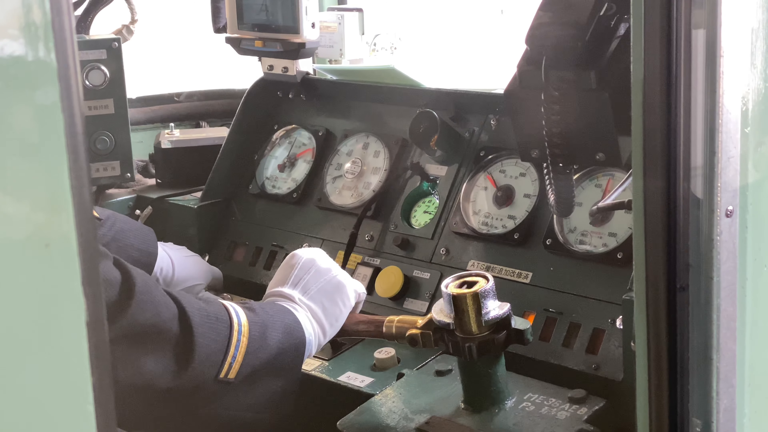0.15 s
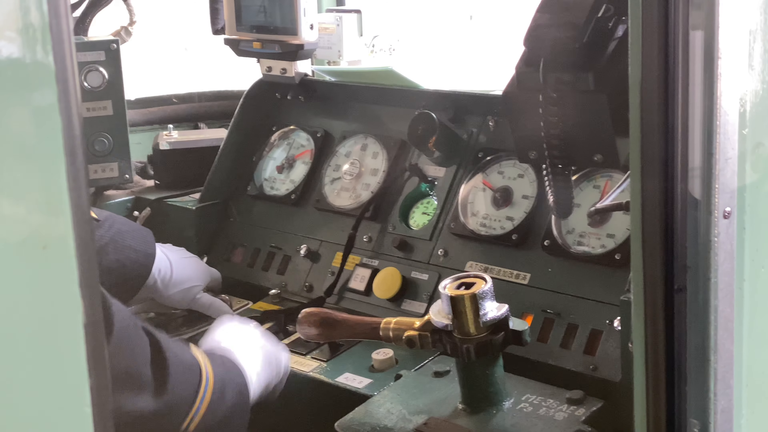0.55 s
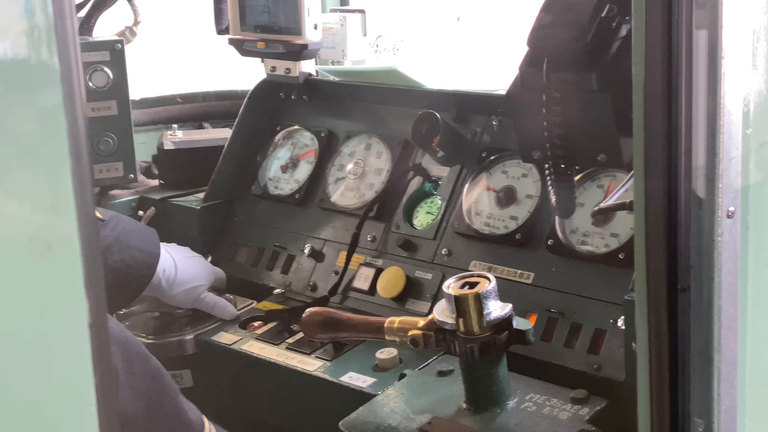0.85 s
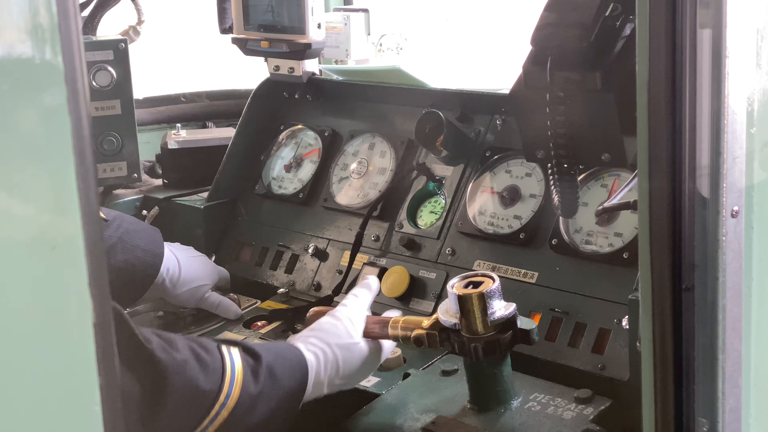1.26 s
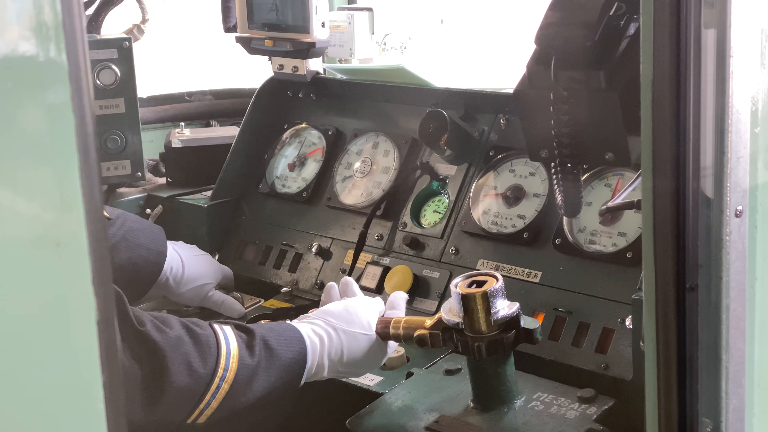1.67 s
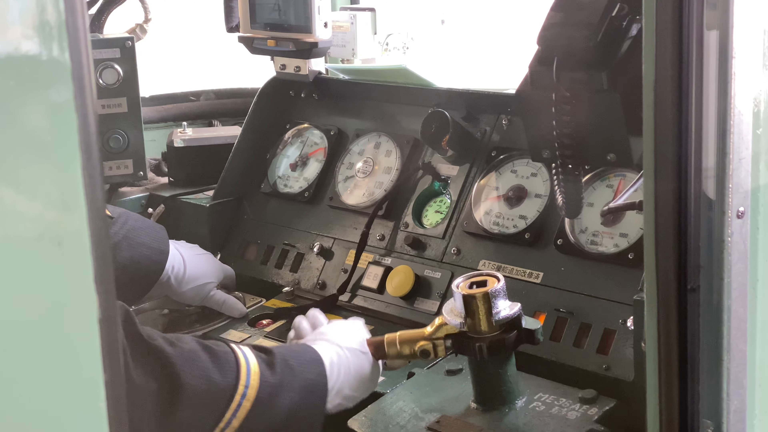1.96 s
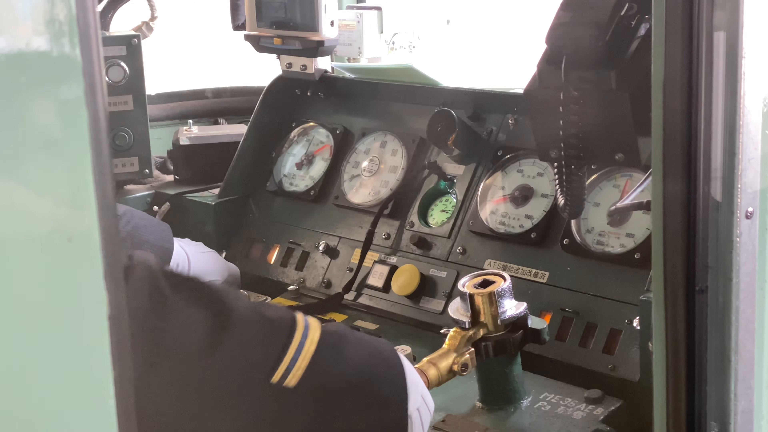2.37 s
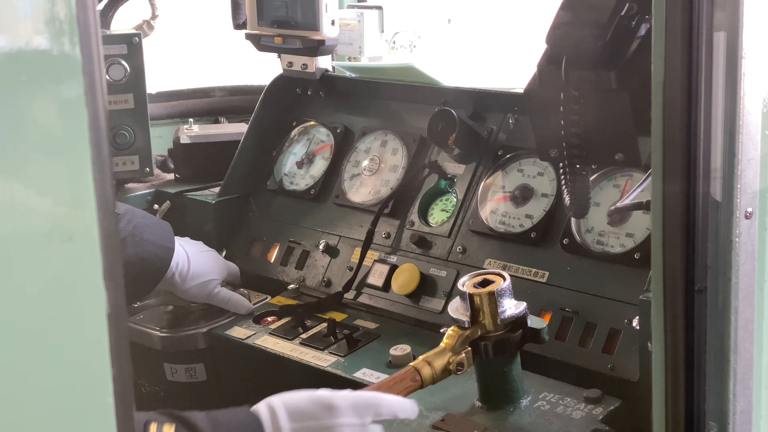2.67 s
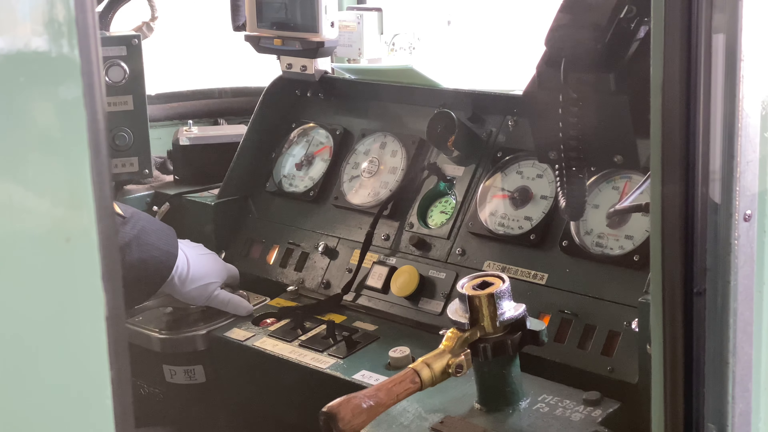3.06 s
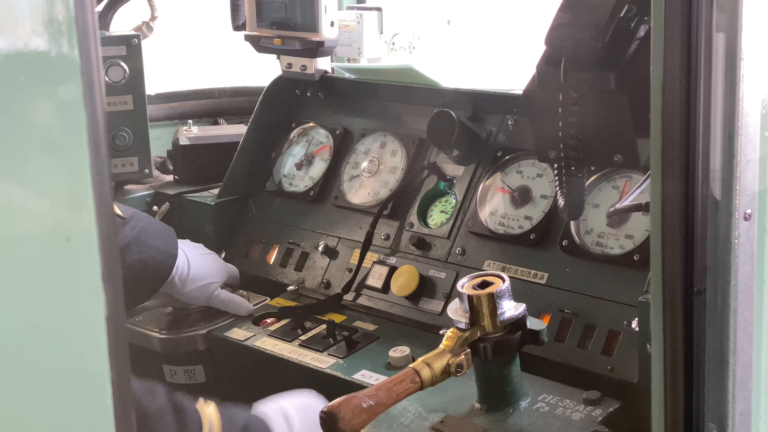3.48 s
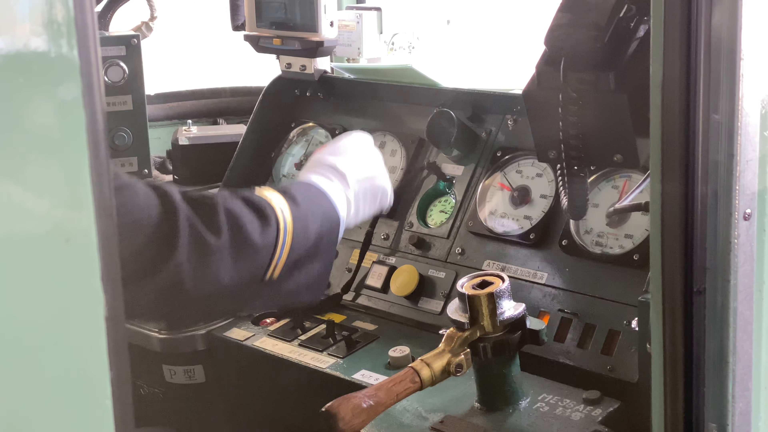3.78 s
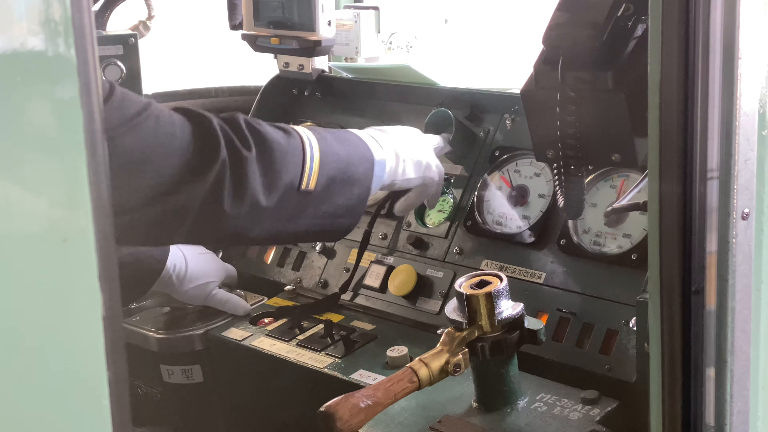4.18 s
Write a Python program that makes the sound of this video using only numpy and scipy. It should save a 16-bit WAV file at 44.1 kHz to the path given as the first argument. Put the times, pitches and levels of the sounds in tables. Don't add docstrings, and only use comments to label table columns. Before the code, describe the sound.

A brake handle ticks and knocks over a deep floor drone until it lands and pressurized air jets out, whistling and shaking loose fittings.

```python
import sys
import numpy as np
from scipy import signal
from scipy.fft import rfft, irfft, next_fast_len
from scipy.io import wavfile
from scipy.ndimage import uniform_filter1d, map_coordinates

SR = 44100
rng = np.random.default_rng(int(sys.argv[2]) if len(sys.argv) > 2 else 0)


def bounce(signal):
    frames = np.transpose(np.atleast_2d(signal))
    limited = np.clip(frames, -1, 1)
    pcm = np.round(limited * 32767).astype(np.int16)
    wavfile.write(sys.argv[1], SR, pcm)


def boost_factor(decibels):
    exponent = np.asarray(decibels, float) / 20
    return 10 ** exponent


N = 195495
T = np.arange(N) / SR
HIT_T = np.arange(SR // 3) / SR

# time [s], level [dB].
TREMBLE = [(0, -31), (.45, -35), (.9, -31.5), (1.2, -42), (1.7, -41.5), (2.0, -42.5), (2.3, -40),
           (2.55, -35), (2.7, -47), (2.97, -41.5), (3.05, -55), (3.2, -42.5), (3.3, -50), (3.5, -42.5),
           (3.7, -37.5), (3.8, -29), (4.3, -30.5), (4.43, -28)]
# peak time [s], peak level [dB], half length [s].
HEAVES = [(.07, -30.5, 0.019), (.26, -29.5, 0.023), (.35, -27.5, 0.02), (.44, -28.5, 0.03),
          (.64, -24.5, 0.037), (.7, -23.5, 0.01), (.82, -24.5, 0.03), (.92, -41, 0.045),
          (1.12, -31.5, 0.024), (1.33, -33, 0.059), (1.58, -37.5, .05), (2.23, -34.5, 0.027),
          (2.36, -26, 0.011), (2.54, -32, 0.056), (2.8, -38, 0.088), (3.0, -37, 0.011),
          (3.31, -30.5, 0.022), (3.37, -25.5, 0.017), (3.76, -31, 0.03), (3.96, -26, 0.054),
          (4.06, -32, 0.029)]
JOLTS = [(.0, -35.5, 0.036, -5.5), (.08, -38.5, 0.024, -6), (.16, -41, 0.049, -4.5),
         (.335, -38.5, 0.057, -20), (.48, -44.5, 0.058, -10), (.6, -46, .02, -17),
         (.71, -38.5, 0.051, -11.5), (.86, -44, 0.021, -6), (1.01, -50, 0.064, -19),
         (1.23, -46.5, 0.02, -7.5), (1.39, -40.5, 0.074, -10), (2.05, -42, 0.038, -4.5),
         (2.15, -43.5, 0.053, -6.5), (2.23, -40, 0.036, -7.5), (2.31, -38, 0.038, -12),
         (2.39, -39.5, 0.033, -8.5), (2.69, -50.5, 0.13, -6.5), (3.015, -44, 0.018, -0.5),
         (3.042, -47.5, 0.0093, 3.5), (3.17, -36, 0.12, -8), (3.26, -42.5, 0.014, 0),
         (3.3, -28.5, 0.013, -12.5), (3.345, -38, 0.03, 1), (3.39, -35, 0.025, -2),
         (3.42, -30.5, 0.028, -7.5), (3.64, -41.5, 0.12, -5), (3.77, -33.5, 0.015, -6),
         (3.9, -29.5, 0.088, -11.5), (4.015, -38, 0.035, -0.5), (4.07, -33, 0.042, -4),
         (4.16, -27.5, 0.057, -6.5), (4.235, -31.5, 0.016, -0.2), (4.29, -31.5, 0.057, -1.5),
         (4.35, -29, 0.023, -4.5), (4.4, -30.5, 0.03, -8.5)]
# frequency [Hz], level [dB].
FLOOR_COLOUR = [(18, -120), (26, -14), (33, -14.5), (42, -7), (56, 2), (68, -4.5), (85, -10), (110, -13),
                (150, -64), (250, -120)]
# frequency [Hz], level [dB].
BODY_COLOUR = [(40, -120), (70, 2), (100, -1.5), (130, 4.5), (200, -2), (240, -14.5), (300, -51),
               (500, -120)]
# frequency [Hz], level [dB].
PANEL_COLOUR = [(120, -120), (200, -3.5), (245, 1), (320, -2.5), (420, -8.5), (490, -16), (600, -24),
                (1000, -120)]
# frequency [Hz], level [dB].
RATTLE_COLOUR = [(250, -120), (450, -4), (535, 2), (650, -0.5), (870, -4), (1180, -10), (1440, -12.5),
                 (1800, -16.5), (2400, -14.5), (4000, -120)]
REST_DB = (-51, -53, -61)
FOLLOW = (0.74, 0.49, 0.15)
# what the jet shakes into each, relative to its own level [dB].
BLOWN_DB = (-14.5, -26.5, -23)

# time [s], flow [dB].
FLOW = [
    (3.06, -62),
    (3.078, -62),
    (3.085, -45),
    (3.1, -36),
    (3.116, -24),
    (3.16, -23),
    (3.6, -27),
    (4.1, -27),
    (4.43, -28.5),
]
# frequency [Hz], level [dB].
JET_COLOUR = [(700, -53), (1000, -19), (1620, -17), (1900, -6), (2390, -6), (3010, -12), (4200, -8.5),
              (5000, -9), (5700, -2.5), (7100, -7.5), (8100, -12.5), (11400, -17.5), (13300, -21.5),
              (14600, -17)]
# frequency [Hz], width [Hz], gain over the first rush [dB],
# gain over the settled jet [dB].
PIPES = [(2123, 14, 9, 9), (2151, 10, 5, 8), (2320, 13, 11, 12), (2405, 40, 2, 6), (2454, 18, 7, 8),
         (2510, 90, 0, 4), (2590, 25, 7, 2), (2653, 16, 7, 6), (2772, 20, -6, 7), (2857, 11, 21, 6),
         (3000, 800, 2, -12), (3140, 20, 11, 3), (3190, 20, 0, 6), (3495, 20, 9, 8), (4063, 28, 7, 6),
         (4256, 22, 6, 5), (5362, 12, 7, 7), (5600, 40, 5, 4), (6868, 18, 6, 6), (7039, 11, 10, 9),
         (7220, 14, 9, 8)]
# frequency [Hz], width [Hz], gain [dB].
HOLLOWS = [(1710, 98, -7.5), (1960, 61, -7), (2175, 60, -2), (2400, 150, 0), (2070, 43, 1)]
# frequency [Hz], level under the flow [dB], width [Hz].
WHISTLES = [(2123, -19, 8), (2151, -19, 8), (2300, -22, 8), (2320, -14, 7), (2412, -22, 12), (2453, -22, 9),
            (2492, -24, 9), (2653, -23, 10)]

# start [s], peak level [dB], ring [Hz], second, weaker ring [Hz], 60 dB decay [s].
TICKS = [(0.128, -43.5, 1470, 2780, 0.13), (1.3437, -47.5, 4480, 2980, 0.16), (1.344, -42, 3180, 5540, .03),
         (1.979, -52, 5600, 7660, 0.022), (2.033, -44, 2130, 2920, 0.025), (2.035, -54, 4140, 1300, 0.04),
         (2.227, -50, 5600, 1130, .03), (2.232, -47, 3700, 2400, .07), (2.9834, -50, 2060, 3670, 0.051),
         (3.0055, -44, 2070, 3540, 0.037), (3.033, -41.5, 3920, 3240, 0.11), (3.04, -41, 1970, 4400, 0.065),
         (3.06, -45, 3900, 3430, 0.063), (3.083, -31.5, 2160, 2440, 0.055)]
# start [s], peak level [dB], frequency [Hz], 60 dB decay [s].
KNOCKS = [(2.042, -26, 163, 0.077), (2.031, -24, 241, 0.049), (2.059, -34, 304, 0.21),
          (2.088, -18, 227, 0.042), (2.221, -29, 208, 0.11), (2.349, -28, 132, 0.076),
          (3.004, -25, 640, 0.044), (3.0322, -22, 322, 0.1), (3.065, -22, 318, 0.13),
          (3.005, -34, 294, 0.073), (3.328, -19, 150, 0.074)]
# start [s], peak level [dB], frequency [Hz], 60 dB decay [s].
LANDING = [
    (3.0843, -16, 143, .06),
    (3.0913, -10.5, 143, .06),
]
# start [s], peak level [dB], frequency [Hz], 60 dB decay [s], snap [dB].
REBOUND = [
    (3.1097, -14.5, 165, .065, -30),
]
# start [s], peak level [dB], frequency [Hz], 60 dB decay [s].
SHUDDERS = [(0.128, -51, 1395, .15), (3.05, -35, 105, 0.22), (3.405, -24, 150.4, .2),
            (3.92, -34, 335, 0.093), (1.235, -38, 250, 0.13), (1.42, -35.5, 180, 0.31),
            (3.15, -26.5, 140, 0.25), (2.13, -38, 231, 0.33), (2.195, -31, 242.5, 0.21),
            (2.216, -33, 444, 0.11), (2.244, -34.5, 309, 0.11), (2.275, -29, 247, 0.13),
            (2.37, -33.5, 234, 0.21), (3.111, -40.5, 894, 0.63), (3.325, -33.5, 614, 0.24),
            (3.621, -36, 392, 0.33), (3.748, -11, 65.7, 0.16), (4.01, -24.5, 205.6, 0.33),
            (4.075, -20, 198, 0.15), (4.09, -34.5, 546, 0.24), (4.184, -15, 190, 0.16),
            (4.28, -14, 195.5, 0.14)]
# start [s], peak level [dB], frequency [Hz], 60 dB decay [s].
CLINKS = [(3.036, -36, 810, 0.11), (3.036, -40.5, 1390, 0.083), (3.038, -39, 1124, 0.084),
          (3.072, -31, 670, 0.045), (3.092, -35, 705, 0.055), (1.105, -47, 817, 0.076),
          (3.245, -37, 656, 0.11), (3.245, -35, 1294, 0.11), (3.315, -31.5, 451, 0.23),
          (3.328, -32, 808, 0.086), (3.355, -24, 636, 0.059), (3.4, -34.5, 618, .1),
          (3.976, -30, 1440, .04), (3.982, -34, 850, 0.067), (4.002, -26, 1470, 0.035),
          (4.003, -30, 1360, .04), (4.045, -35, 1310, .05), (4.085, -37, 1280, 0.093),
          (4.095, -37, 1460, .06), (4.145, -34, 1290, 0.055), (4.11, -31, 543, 0.05),
          (4.01, -29.5, 855, 0.12), (4.03, -28, 595, 0.073), (4.16, -31, 900, .06), (4.19, -29, 550, 0.099),
          (4.218, -29, 860, .07), (4.24, -32, 960, .06), (4.275, -33, 1430, 0.1), (4.29, -32, 826, 0.11),
          (4.335, -31.5, 626, 0.11), (4.375, -35, 860, .08)]
# start [s], peak level [dB], frequency [Hz], 60 dB decay [s], snap [dB].
POPS = [(0.144, -30.5, 408, 0.012, -13), (0.303, -31, 437, 0.0099, -25), (0.333, -37.5, 357, 0.014, -11),
        (0.465, -30.5, 387, 0.011, -27), (0.538, -37, 324, 0.034, -24), (0.582, -29, 363, 0.015, -17),
        (0.625, -35, 345, 0.018, -27), (0.739, -25, 357, 0.013, -32), (0.85, -32, 333, 0.02, -19),
        (1.226, -31, 345, 0.0082, -24), (2.015, -51, 348, 0.014, -13), (2.042, -30, 314, 0.011, -6),
        (2.201, -27, 387, 0.0081, -22), (3.986, -32, 376, 0.011, 8), (4.229, -30, 374, 0.013, 4.5)]
# start [s], peak level [dB], low edge [Hz], high edge [Hz],
# 60 dB decay [s].
SCUFFS = [(0.0, -50, 900, 3600, 0.41), (0.011, -56, 6000, 10500, .015), (0.046, -58, 4000, 11000, .02),
          (0.056, -56, 4000, 10000, .02), (0.1326, -54, 2500, 10500, .025), (0.15, -54, 900, 1300, 0.18),
          (0.465, -54, 400, 1100, .015), (1.25, -57.5, 500, 1200, 0.22), (1.9457, -60, 6000, 12000, .02),
          (0.143, -48, 500, 3000, .04), (0.582, -58, 500, 2000, 0.017), (1.343, -55, 2800, 5500, .03),
          (1.9662, -57, 4500, 8000, .03), (1.9787, -54, 5200, 8500, .04), (2.034, -45, 1200, 4600, 0.028),
          (2.04, -56, 1000, 8000, 0.19), (2.203, -51, 500, 1500, .02), (2.2261, -54, 3000, 7500, .05),
          (2.984, -56, 500, 4000, 0.037), (3.007, -49, 500, 2500, .03)]

# time [s], level [dB], brightness [dB].
LEAK = [(0, -57.5, -6), (.1, -56.5, -11), (.24, -56.5, -1), (1.35, -63, -0.5), (1.7, -65, -1),
        (1.96, -63, -3), (2.3, -63, -11), (2.5, -67, -9), (2.61, -63.5, -9), (2.82, -61, -10),
        (2.9, -62.5, -9), (2.981, -67.5, -12), (2.987, -57, -9), (3.029, -61, -10), (3.034, -51, -14),
        (3.08, -54, -8), (3.12, -54, 5)]
# frequency [Hz], level [dB].
LEAK_COLOUR = [(940, -54), (1600, -6.5), (2300, -4), (3000, -3), (4150, 0), (4900, -2.5), (5600, -0.5),
               (6400, -3), (7200, -2), (8400, -10), (11500, -8.5), (13500, -20.5), (14800, -13.5),
               (16000, -21)]
# peak time [s], peak level [dB], half length [s], brightness [dB].
PUFFS = [
    (.14, -59, 0.013, -5),
    (2.01, -61, 0.053, -4),
    (2.14, -61.5, 0.11, -5),
    (2.24, -59.5, 0.04, -8),
    (2.7, -63, 0.052, -2.5),
    (2.75, -60.5, 0.043, -3.5),
    (3.05, -53.5, 0.033, -5.5),
]

# frequency [Hz], side over mid [dB].
WIDTH = [(30, 10), (60, 5), (110, 6.5), (200, -2.5), (380, -10), (700, -6), (1300, 0.5), (1750, -10),
         (1900, -67), (2300, -60), (2600, -4.5), (6200, -9), (6500, -74), (7850, -57), (8000, 0), (8700, 5),
         (10300, -5.5), (10500, -62), (11700, -66), (11900, 2), (12800, 4), (13500, 12), (14300, 4),
         (15000, -20), (15400, -60)]
# low edge, high edge [Hz].
GAP_HZ = (13200, 13900)
# from [s], to [s], how far a band must then stand out.
BUSY = [
    (0, .78, .25),
    (1.3, 1.5, .5),
    (2.0, 2.3, .1),
    (2.9, 3.39, -.2),
    (4.0, 4.09, -.1),
    (4.27, 4.43, .4),
]


def cab():
    tremble_db, = curves(TREMBLE)
    opened, flow_db = valve()
    floor = np.sqrt(boost_factor(tremble_db) ** 2 + swells(HEAVES))
    parts = []
    for step, (rest_db, follow, blown_db) in enumerate(zip(REST_DB, FOLLOW, BLOWN_DB)):
        trembling = boost_factor(rest_db + follow * (tremble_db + 40))
        blown = opened * boost_factor(flow_db + blown_db)
        parts.append(np.sqrt(trembling ** 2 + blown ** 2 + swells(JOLTS, step)))
    jolts_db = 0.7 * wobble(14)
    drone = evened(rush(colour(FLOOR_COLOUR), patchy_db=1.8), over_s=0.04, share=0.8)
    drone = floor * boost_factor(0.34 * wobble(3.2)) * drone
    body = evened(rush(colour(BODY_COLOUR), patchy_db=-0.4), over_s=0.075, share=1.0)
    body = parts[0] * boost_factor(jolts_db + 0.96 * wobble(24.62)) * body
    panel = rush(colour(PANEL_COLOUR), patchy_db=1.05)
    panel = parts[1] * boost_factor(-0.55 + jolts_db + 0.27 * wobble(30.5)) * panel
    rattle = rush(colour(RATTLE_COLOUR), patchy_db=0.27)
    rattle = parts[2] * boost_factor(-1.46 + jolts_db + 1.73 * wobble(40)) * rattle
    return drone + body + panel + rattle


def jet():
    opened, flow_db = valve()
    short_db = -24.5 - flow_db
    whistle_db = -2.5 + 0.57 * short_db
    sizzle_db = -7 + np.minimum(short_db, 0.5)
    top_db = -1.5 - 0.17 * short_db

    def first_gain(hz):
        return boost_factor(along(JET_COLOUR, hz)) * pipes(hz, settled=False) ** 0.75

    def settled_gain(hz):
        hollows_db = sum(db * np.exp(-((hz - centre) / width) ** 2) for centre, width, db in HOLLOWS)
        return boost_factor(along(JET_COLOUR, hz) + hollows_db) * pipes(hz) ** 1.05

    broad = rush(first_gain, patchy_db=1.3)
    tight = rush(settled_gain, patchy_db=1)
    settle = np.clip((T - 3.2) / 0.6, 0.1, 0.92) * np.pi / 2
    noise = np.cos(settle) * broad + np.sin(settle) * tight
    low, middle, high = below(noise, hz=2420), below(noise, hz=4840), below(noise, hz=7000)
    blend = boost_factor(whistle_db) * low + (middle - low)
    blend = blend + boost_factor(sizzle_db) * (high - middle) + boost_factor(top_db) * (noise - high)
    return opened * boost_factor(flow_db + 0.069 * wobble(4.8) + 0.37 * wobble(60)) * blend


def valve():
    return np.clip((T - 3.04) / 0.035, 0, 1), curves(FLOW)[0]


def pipes(f, settled=True):
    ripple = map_coordinates(rng.standard_normal(SR // 40), [f / 21])
    power = 1
    for hz, width, rush_db, settled_db in PIPES:
        peak = boost_factor(settled_db if settled else rush_db)
        power = power + (peak * f * width) ** 2 / ((hz * hz - f * f) ** 2 + (f * width) ** 2)
    return np.sqrt(power) * boost_factor(1.4 * ripple)


def whistles():
    opened, flow_db = valve()
    tones = 0
    for hz, db, width in WHISTLES:
        drift = np.cumsum(rng.normal(0, np.sqrt(2 * np.pi * abs(width) / SR), N))
        tones = tones + boost_factor(db + 2.5 * wobble(16)) * np.sin(2 * np.pi * hz * T + drift)
    return opened * boost_factor(flow_db) * np.clip((T - 3.3) / 0.39, 0, 1) * tones


def handle():
    hits = laid([*ticks(), *blows(), *pops()])
    return filtered(hits, lambda f: 1 / (1 + (40 / (f + 1)) ** 4))


def ticks():
    for s, db, hz, second_hz, t60 in TICKS:
        drift = np.cumsum(rng.normal(0, 0.12, (2, len(HIT_T))), axis=1)
        ring = np.sin(2 * np.pi * hz * HIT_T + drift[0])
        ring = ring + 0.57 * np.sin(2 * np.pi * second_hz * HIT_T + drift[1])
        crack = band_noise(0.96 * min(hz, second_hz), 0.86 * max(hz, second_hz))
        crack = crack * (0.7 * boost_factor(-60 * HIT_T / 0.03) + 0.35 * boost_factor(-60 * HIT_T / 0.25))
        yield s, boost_factor(db - 5) * (boost_factor(-60 * HIT_T / t60) * ring + crack)


def blows():
    for s, db, hz, t60 in [*KNOCKS, *LANDING, *SHUDDERS, *CLINKS]:
        onset = 1 - np.exp(-HIT_T / 0.0046)
        yield s, boost_factor(db + 1.0 - 60 * HIT_T / t60) * onset * np.sin(2 * np.pi * hz * HIT_T)


def pops():
    for s, db, hz, t60, snap_db in [*POPS, *REBOUND]:
        push = np.sin(2 * np.pi * hz * HIT_T) + boost_factor(snap_db + 1) * np.sin(2 * np.pi * 2.3 * hz * HIT_T)
        yield s, boost_factor(db + 5.5 - 60 * HIT_T / t60) * (1 - np.exp(-HIT_T / 0.001)) * push


def scuffs():
    return laid((s, boost_factor(db - 60 * HIT_T / t60) * unit(band_noise(low_hz, high_hz)))
                for s, db, low_hz, high_hz, t60 in SCUFFS)


def leak():
    leak_db, bright_db = curves(LEAK)
    seep = rush(lambda f: boost_factor(along(LEAK_COLOUR, f)) * pipes(f) ** 0.7, patchy_db=1.1)
    low = below(seep, hz=6700)
    dull = np.sqrt(boost_factor(leak_db) ** 2 + swells(PUFFS))
    bright = np.sqrt(boost_factor(leak_db + bright_db) ** 2 + swells(PUFFS, 1))
    return boost_factor(-0.82 + 0.4 * wobble(9.7)) * (dull * low + boost_factor(5.0) * bright * (seep - low))


def ports(direct, diffuse, share):
    side = filtered(direct, lambda f: 1j * share * boost_factor(along(WIDTH, f)))
    side = side + filtered(diffuse, lambda f: np.sqrt(1 - share ** 2) * boost_factor(along(WIDTH, f)))
    return np.array([direct + side, direct - side])


def thinned(mid, side):
    hz, t, z = signal.stft(np.array([mid, side]), SR, nperseg=1024)
    hz, band = hz[:, None], np.arange(len(hz)) // 13
    field = unit(uniform_filter1d(rng.standard_normal((40, len(t))), 5, 1))[band]
    usual = 1.0
    needed = usual + sum((far - usual) * (t >= a) * (t < b) for a, b, far in BUSY)
    stands_out = field > needed + (hz - 3500) ** 2 / 6e6
    z[1] *= stands_out | (hz < 1900) | (hz > 7000)
    reach = np.where(t < 3.08, 550, 130)
    reach = reach * np.exp(np.clip(0.7 * field[[300, 330]], -1.5, 0.8))
    reach = reach + 420 * (field[[340, 360]] > 1.2)
    outside = (hz < GAP_HZ[0] + 130 - reach[0]) | (hz > GAP_HZ[1] - 130 + reach[1])
    z[0] *= outside & (hz < 15950)
    mid, side = signal.istft(z, SR, nperseg=1024)[1][:, :N]
    return np.array([mid + side, mid - side])


def unit(x):
    return x / np.sqrt(np.mean(x ** 2) + 1e-20)


def along(points, hz):
    f, v = np.transpose(points)
    return np.interp(np.log(hz + 1), np.log(f + 1), v)


def colour(points):
    return lambda hz: boost_factor(along(points, hz))


def curves(rows):
    s, *cols = np.transpose(rows)
    return [np.interp(T, s, c) for c in cols]


def wobble(rate):
    return map_coordinates(rng.standard_normal(int(N * rate / SR) + 4), [np.arange(N) * rate / SR])


def swells(rows, step=0):
    return sum(boost_factor(db + step * sum(hard)) ** 2 * np.exp(-((T - s) / half) ** 2)
               for s, db, half, *hard in rows)


def filtered(x, response):
    m = next_fast_len(N + SR // 2)
    return irfft(rfft(x, m) * response(np.fft.rfftfreq(m, 1 / SR)), m)[..., :N]


def below(x, hz):
    return filtered(x, lambda f: 1 / (1 + (f / hz) ** 12))


def rush(gain, patchy_db):
    z = signal.stft(rng.standard_normal((2, N)), nperseg=512)[2]
    field = uniform_filter1d(uniform_filter1d(rng.standard_normal(z.shape[1:]), 6, 0), 10, 1)
    pair = signal.istft(z * boost_factor(patchy_db * unit(field)), nperseg=512)[1][:, :N]
    return unit(filtered(pair, gain))


def evened(x, over_s, share):
    size = int(over_s * SR)
    power = uniform_filter1d(uniform_filter1d(x ** 2, size, axis=-1), size, axis=-1)
    return unit(x / (np.abs(power) + 1e-3) ** (share / 2))


def band_noise(low_hz, high_hz):
    b, a = signal.butter(2, [low_hz, high_hz], "band", fs=SR)
    return signal.lfilter(b, a, rng.standard_normal(len(HIT_T)))


def laid(hits):
    out = np.zeros(N + SR)
    for s, sound in hits:
        out[round(s * SR):][:len(sound)] += sound
    return out[:N]


def scene():
    rumble = ports(*cab(), share=0.32) * boost_factor([[-0.8], [0.8]])
    hiss = ports(*(jet() + leak()), share=0.78)
    hits = handle() + scuffs() + whistles()
    return rumble + hiss + ports(hits, 0 * hits, share=0.67)


def band_limit(x):
    return signal.sosfilt(signal.butter(12, 16710, fs=SR, output="sos"), x)


def record(dry):
    mix = thinned((dry[0] + dry[1]) / 2, (dry[0] - dry[1]) / 2)
    return band_limit(mix)


dry = scene()
out = record(dry)
bounce(out)
```